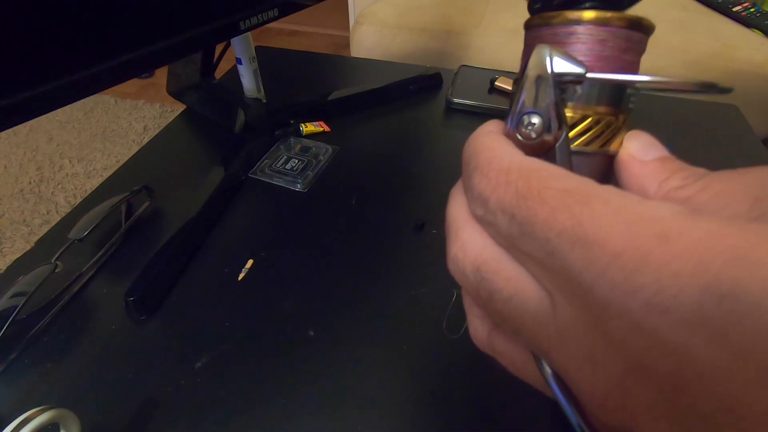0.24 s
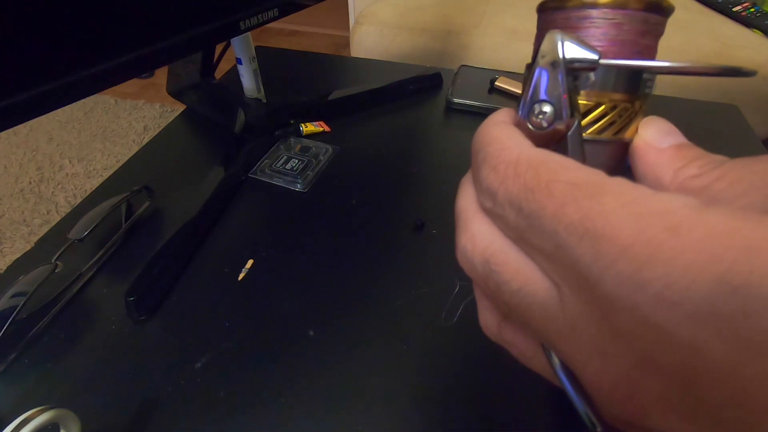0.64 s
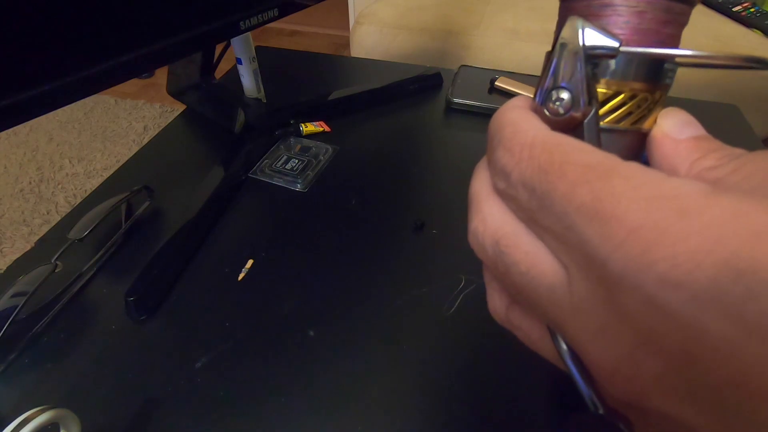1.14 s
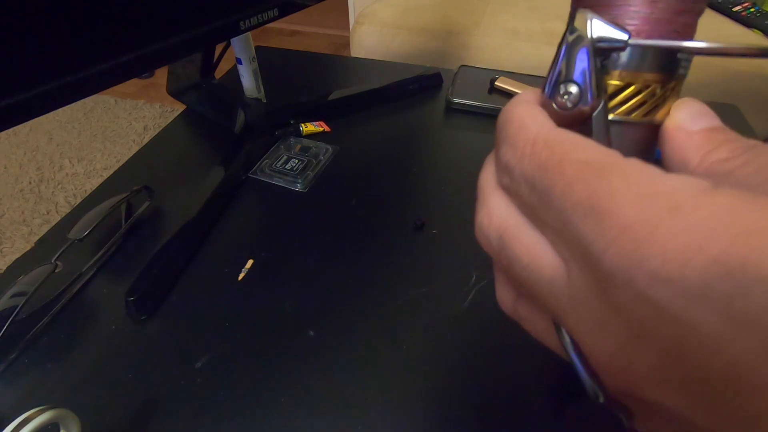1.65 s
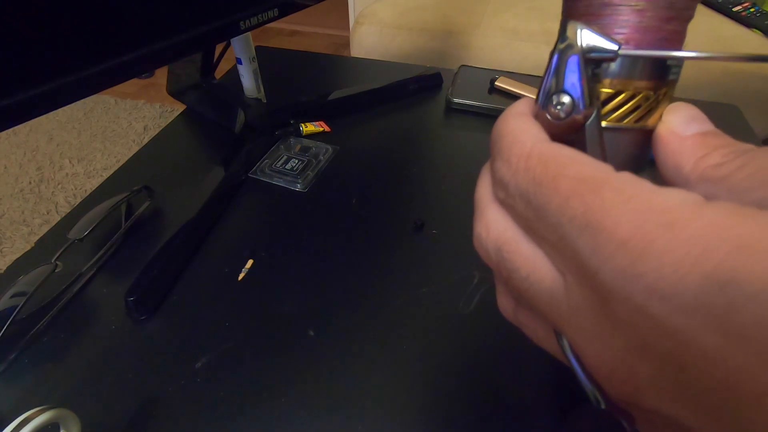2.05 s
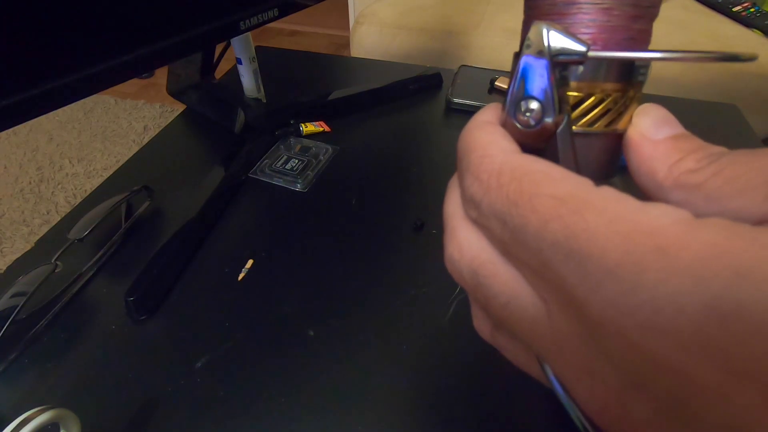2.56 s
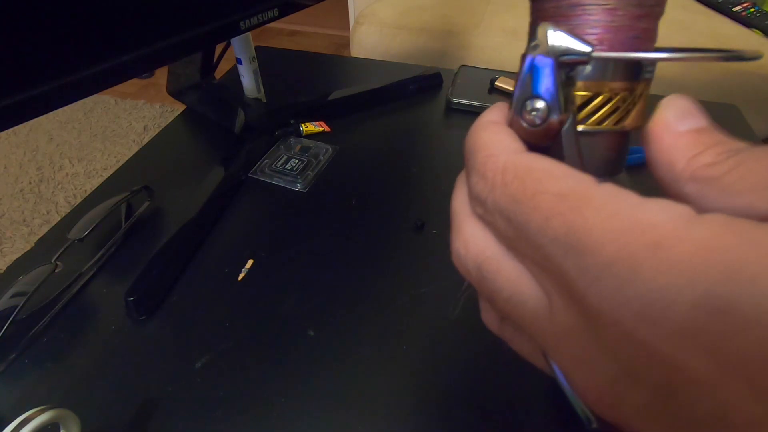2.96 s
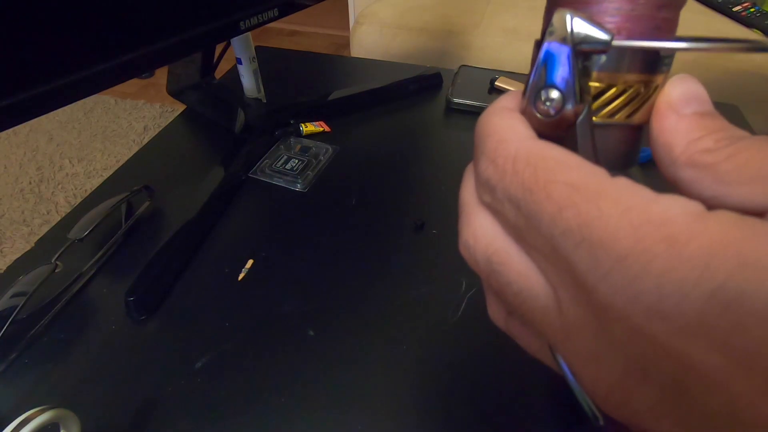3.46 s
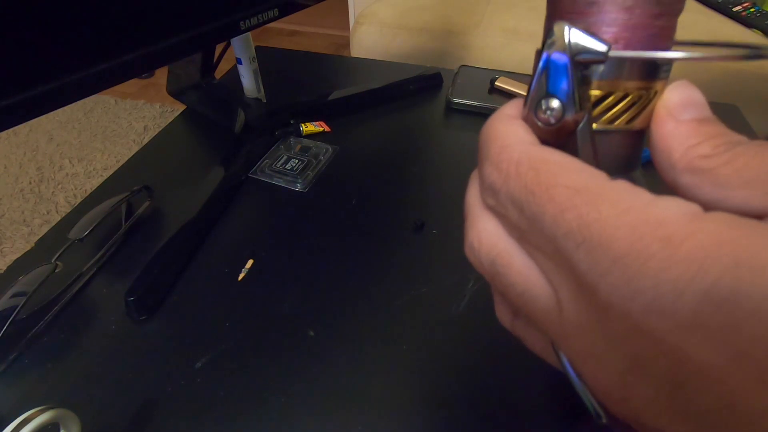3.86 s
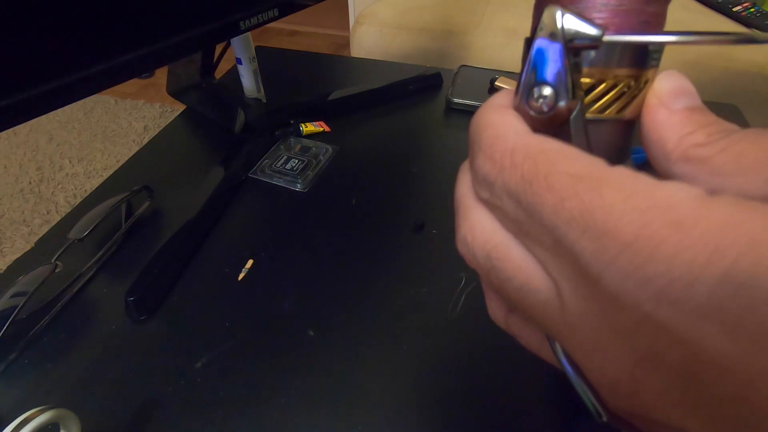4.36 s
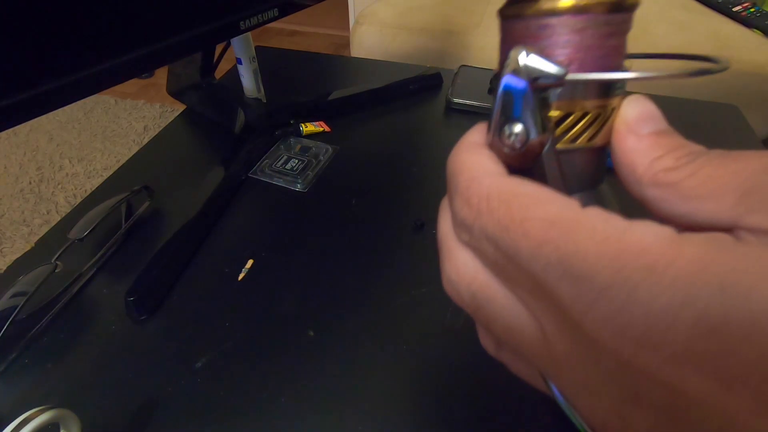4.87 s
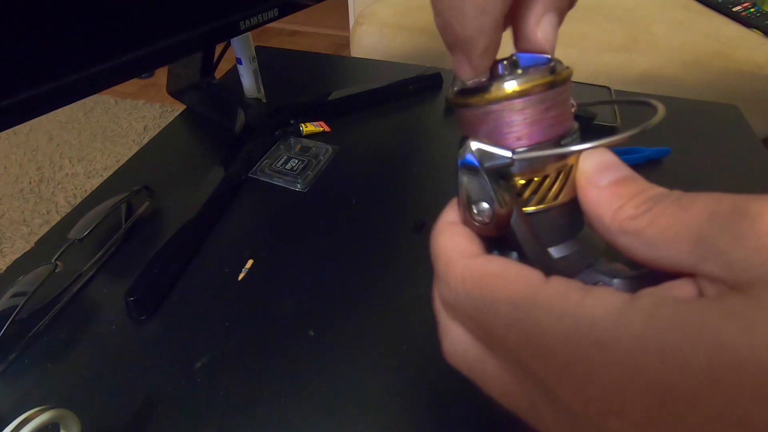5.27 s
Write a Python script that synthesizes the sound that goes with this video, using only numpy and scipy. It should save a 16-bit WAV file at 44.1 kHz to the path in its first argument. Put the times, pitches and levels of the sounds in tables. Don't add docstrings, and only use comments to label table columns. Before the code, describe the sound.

A close, dry stereo take of a fishing reel handled over a desk in a small furnished room, with quiet air hush and a faint wandering low drone throughout. The first half second is nearly still, with tiny finger ticks around 0.5. A hard latch click comes at 0.75, its spring-back double click at 0.82. Light taps follow at 1.1 and 1.4, a sharp snap at 1.53, then a loose metal bail stumbles shut at 1.6-1.65 with rattle and a brief buzz. The drag ratchets in five runs: nine slow, uneven, gathering clicks at 2.0-2.5; then quick, bright, thin metallic runs at 3.0-3.4, 3.85-4.2, 4.6-4.85 and 5.35-5.5, roughly 50 to 85 clicks per second at their densest. Each click is a millisecond-short, hollow, ringing tick around 3-4 kHz with crisp treble and a short room tail. Between runs, faint creaks, skin rub, small slips and soft palm thuds.

```python
import sys
import numpy as np
from scipy import signal
from scipy.fft import rfft, irfft, next_fast_len
from scipy.io import wavfile

SR = 44100
rng = np.random.default_rng(int(sys.argv[2]) if len(sys.argv) > 2 else 0)


def inscribe(sig):
    pcm = np.round(np.clip(np.atleast_2d(sig).T, -1, 1) * 32767)
    wavfile.write(sys.argv[1], SR, pcm.astype(np.int16))


def gain_from_decibels(decibels):
    exponent = np.asarray(decibels, float) / 20
    return 10 ** exponent


N = 242991

# frequency in Hz, level in dB, T60 in s, phase lead of the left port in radians.
SPOOL = [(1500, -36, 0.0061, 0.3), (2023, -23, 0.025, 0.2), (2534, -6.5, 0.012, 0.1),
         (2837, -10.5, .008, .1), (3190, -5.5, 0.017, 0.14), (3403, 0, 0.014, 0.1),
         (3813, -0.5, 0.01, 0.099), (4344, -5, 0.011, 0.4)]
RIM = [(5320, -9, 0.014, 0.6), (6000, -7, 0.011, 1), (7100, -2, 0.009, 0.84), (6540, -9.5, 0.011, 0.96),
       (7720, 0, 0.009, 0.28), (8390, -7, 0.014, 0.99)]
SPRING = [(8800, -17, 0.0099, -2.4), (9530, -1, 0.0086, -2.02), (9930, -7.5, 0.0087, -0.15),
          (10410, -8, 0.01, 1)]
# spool tilt at start and at end in dB per octave, body level in dB,
# level of the creep left after it in dB.
GRIPS = [
    (23.5, 15, -35.5, -65.5),
    (-7, -15.5, -38, -82),
    (-12, -9.5, -32, -68),
    (-3, -4, -34, -65),
    (5.5, 6.5, -31, -70),
]


def twists():
    # time in s, strength in dB, facing in dB (plus turns the spool wall to the ports, minus the rim),
    # lean in dB (plus favours the lower wall modes' rivals above), spring in dB above the strength.
    twist_1 = [
        (1.9756, -20.5, -2.5, -0.35, 4.5),
        (2.0193, -15, -2.5, 0.35, 1.5),
        (2.1584, -13, 0, 3.5, 0),
        (2.2192, -12.5, 2, 2, -0.5),
        (2.3274, -12, 1.5, 2.7, -5.5),
        (2.373, -9.5, 1, 1.8, -2),
        (2.4192, -9.5, 0.5, 0.67, -2.5),
        (2.4458, -7.5, 1.5, -1.3, -7),
        (2.4909, -8, -3, -1.2, -6),
    ]
    twist_2 = [(2.9846, -16, -4.5, 7.5, -0.5), (3.0391, -9.5, -5, 4.5, 0.5), (3.0753, -8.5, -2.5, 4, -0.5),
               (3.0981, -7.5, -5.5, 7, -4.5), (3.1196, -11.5, -4, 1, 3.5), (3.142, -13, -8, -6, 5),
               (3.1618, -8, -7, -2.5, 3), (3.1784, -11.5, -7, -4, 5.5), (3.194, -13.5, -6.5, -3.5, 4),
               (3.2088, -12.5, -7, -0.5, 6), (3.2243, -12, -5.5, 1.5, 5), (3.2401, -13.5, -6, 0, 6.5),
               (3.2621, -16.5, -9, -6, 5.5), (3.289, -13.5, -6.5, 0.5, 3), (3.3116, -16.5, -6, -5.5, 2),
               (3.3308, -14.5, -6.5, 3, 1), (3.3497, -14.5, -3.5, 1.5, -2), (3.37, -13, -6, -3.5, -2.5),
               (3.3973, -14, -6, -2, -2.5)]
    twist_3 = [(3.8573, -15.5, -3, 0.5, 5), (3.8734, -14, -4.5, -3.5, -1), (3.888, -13.5, -5, -1.5, 1.5),
               (3.905, -14.5, -6, -5.5, 6), (3.9291, -14, -8, -4.5, 2.5), (3.9585, -13.5, -6, -1.5, 5.5),
               (3.9794, -13.5, -4, 2.5, 5.5), (3.9967, -11, -0.5, -0.5, 7.5), (4.0108, -14.5, 0.5, 6.5, 6),
               (4.024, -10, -2, 0, 3.5), (4.0356, -12, -2, -1.5, 3.5), (4.0475, -9.5, -1, -1, 4.5),
               (4.0603, -13, -2, 2.5, 2.5), (4.0732, -12.5, -3, 1, 4), (4.0863, -11.5, -9, -7, 5.5),
               (4.1002, -8, -1.5, 1.5, 3), (4.1145, -11, -3, -6, 1.5), (4.13, -8, -2, -1.5, -2.5),
               (4.1495, -11, -1.5, -0.5, -0.5), (4.1816, -15, -2, -8, 2)]
    twist_4 = [(4.6063, -14.5, -5.5, -4, 4.6), (4.6239, -14.5, -4, -2, 6), (4.6357, -13.5, -1, -3.5, 4.5),
               (4.646, -10.5, -5, 2, 7.4), (4.6581, -13.5, -3.5, -5, 6.5), (4.6695, -11, -2.5, 1, 7),
               (4.6846, -14, -1.5, -3.5, 9.8), (4.7008, -9.5, -3.5, -3, 6), (4.7174, -13, -3.5, 0.5, 8.4),
               (4.7329, -12.5, -0.5, -1, 5.3), (4.7488, -12.5, -3, 0, 5.5),
               (4.7631, -11.5, -1.5, -0.5, 4.9), (4.7765, -9.5, -1.5, 0, 7), (4.791, -9.5, -3.5, -5, 3),
               (4.8052, -10.5, -5, -7.5, 1.5), (4.8224, -11.5, -4.5, -9, 1.0), (4.8379, -12, -1, 0.5, 3.7),
               (4.8584, -16, -2.5, -3, 4.9)]
    twist_5 = [(5.3496, -15, -0.5, -0.0078, 4.1), (5.379, -12, -0.5, -0.2, 3),
               (5.399, -11.5, -0.5, -1.2, 5.8), (5.4138, -14, -1.5, -0.86, 5.5),
               (5.4265, -10.5, -1, -1.2, 4.5), (5.4379, -10.5, -0.5, -2.0, 5.4), (5.447, -12, 1, -0.5, 1.5),
               (5.458, -9, 2, -0.19, 0.91), (5.47, -15, 0, 0.66, 4.5), (5.4903, -12.5, -1.5, 0.5, 4.5),
               (5.5063, -15, 1.5, -1.0, 3.5)]
    return [np.transpose(t) for t in (twist_1, twist_2, twist_3, twist_4, twist_5)]


def arch(along, top, sag_db):
    return -sag_db * ((along - top) / max(top, 1 - top)) ** 2


def clicker():
    # frequency in Hz, level in dB, T60 in s, left lead in radians.
    body_modes = [(760, -14, 0.0041, 0.61), (900, -3, 0.053, 0.35), (1176, -0.5, 0.042, 1),
                  (1525, 7.5, 0.016, 0.25)]
    edge_modes = [(11200, -3, 0.0086, .3), (11900, -4.5, .007, 0), (12400, -3, 0.0088, -0.16),
                  (12500, -2.5, .007, -.2), (13470, -1.5, 0.0066, -0.38), (13800, 0, 0.006, 0.31),
                  (14600, -1, 0.007, 0.81), (15200, -3.5, .006, 0), (15800, -14.5, .005, -.9)]
    take_up_s, take_up_db = 0.0107, -38
    walls_ignore = 0.23
    runs = twists()
    rows = []
    for (s, *_), (tilt_from, tilt_to, grip_db, _) in zip(runs, GRIPS):
        along = np.linspace(0, 1, len(s))
        swell = arch(along, top=0.77, sag_db=9)
        tilt = tilt_from + (tilt_to - tilt_from) * along
        rows.append([grip_db + swell, tilt, -14.5 + 0.79 * swell])
    body_db, tilt_db, edge_db = np.concatenate(rows, axis=1)
    s, db, facing, lean, spring = np.concatenate(runs, axis=1)

    turns_db = [facing - lean, facing + lean, -facing]
    lower_db, upper_db, rim_db = [db + turn_db for turn_db in turns_db]
    turning = [
        strike(s, lower_db - 0.06, SPOOL[:6], spread_db=5.0, detune=0.016, rise_s=0.0004524, tilt_db=tilt_db),
        strike(s, upper_db - 0.26, SPOOL[6:], spread_db=2.5, detune=0.036, rise_s=0.0004487),
        strike(s, rim_db + 0.88, RIM, spread_db=4.0, detune=0.025, rise_s=0.000399)]
    rest = strike(s, db + spring + 0.44, SPRING, spread_db=1.5, detune=0.02, rise_s=0.0003007)
    rest += strike(s, edge_db, edge_modes, spread_db=4.5, detune=0.018, rise_s=0.0002)
    first = np.array([t[0, 0] for t in runs]) - take_up_s
    rest += strike(first, take_up_db + 0 * first, RIM + SPOOL[2:], spread_db=5.5, detune=0.046, rise_s=0.0003)
    body = strike(s - 0.00045, body_db, body_modes, spread_db=3.0, detune=0.051, rise_s=0.00049)
    body = radiate(body, hz=455)

    latest = np.clip(np.searchsorted(s, np.arange(N) / SR + 1 / SR) - 1, 0, None)
    walls = sum(x * gain_from_decibels(-walls_ignore * turn_db[latest]) for x, turn_db in zip(turning, turns_db))
    return radiate(sum(turning) + rest, hz=1430) + body, radiate(walls + rest, hz=1350) + body


def strike(times, peaks_db, modes, spread_db, detune, rise_s, tilt_db=0, pitch_hz=1):
    ring_share, crack_s, out_of_step_rad = 0.84, 0.0011, 0.85
    pan_db_per_octave, pan_spread_db = 1.5, 3.5
    hz, db, t60, lead = np.repeat(modes, 2, axis=0).T[:, None, :, None]
    draw = rng.standard_normal((len(times), 5, 2 * len(modes), 1))
    t = np.arange(700) / SR
    pitch = np.reshape(pitch_hz, (-1, 1, 1))
    db = db + np.reshape(tilt_db, (-1, 1, 1)) * np.log2(hz / 3400) + spread_db * draw[:, 0]
    turn = 2 * np.pi * hz * pitch * (1 + detune * draw[:, 1]) * (t - rise_s) + out_of_step_rad * draw[:, 2]
    onset = 1 - np.exp(-(t / rise_s) ** 2)
    size = gain_from_decibels(db - 60 * t / t60) * onset * (ring_share + np.exp(-t / crack_s))
    apart = (lead + (0.57 * lead + 0.092 + 0.1 * (hz / 4000) ** 2) * draw[:, 3]) / 2
    pan = gain_from_decibels((pan_db_per_octave * np.log2(hz * pitch / 6000) + pan_spread_db * draw[:, 4]) / 2)
    left = (size * pan * np.exp(1j * (turn + apart))).sum(axis=1)
    right = (size / pan * np.exp(1j * (turn - apart))).sum(axis=1)
    gain = gain_from_decibels(peaks_db) / np.abs(left + right).max(axis=1) * 2
    out = np.zeros((2, N + 700))
    at = np.round(np.asarray(times) * SR).astype(int)[:, None] + np.arange(700)
    np.add.at(out[0], at, gain[:, None] * left.imag)
    np.add.at(out[1], at, gain[:, None] * right.imag)
    return out[:, :N]


def ring(push, hz, t60, lead):
    pole = gain_from_decibels(-60 / (t60 * SR)) * np.exp(2j * np.pi * hz / SR)
    z = signal.lfilter([1], [1, -pole], push + 1e-18)
    return np.array([np.imag(z), np.imag(z * np.exp(-1j * lead))])


def radiate(x, hz):
    return signal.sosfilt(signal.butter(4, hz, "high", fs=SR, output="sos"), x)


def slipping_washer():
    # time in s, level in dB.
    slip_events = [(0.322, -56), (2.1477, -41.5), (2.5764, -24.5), (2.766, -50.5), (2.806, -43),
                   (2.85, -49.5), (2.893, -53.5), (3.546, -46.5), (3.7041, -33.5), (3.7084, -36),
                   (3.772, -41), (3.797, -44), (3.812, -45), (3.835, -48), (4.1562, -34), (4.2793, -45),
                   (4.304, -50), (4.3358, -50), (4.364, -51), (4.3874, -41.5), (4.4409, -53), (4.5026, -57),
                   (4.5201, -51.5), (4.586, -54), (4.854, -22), (5.163, -52), (5.178, -51), (5.187, -53),
                   (5.08, -25.5), (5.088, -46.5), (5.3196, -41.5), (5.3318, -35)]
    # frequency in Hz, level in dB, T60 in s, left lead in radians.
    hollow = [(2700, -8.5, .008, .1), (3218, 3, 0.012, .1), (3650, -6.5, .012, .1), (4150, -17, 0.0064, .2)]
    s, db = np.transpose(slip_events)
    out = strike(s, db - 1.0, hollow, spread_db=-0.5, detune=0.015, rise_s=0.00042)
    out += strike(s, db - 2, SPOOL, spread_db=-3.0, detune=0.0091, rise_s=0.00021, tilt_db=-2.5)
    return out + strike(s, db - 10.5, RIM + SPRING, spread_db=1.0, detune=0.04, rise_s=0.00046)


def half_snaps():
    # time in s, level in dB.
    half_events = [
        (1.5307, -12.5),
        (1.5316, -29),
        (1.536, -41),
    ]
    # frequency in Hz, level in dB, T60 in s, left lead in radians.
    half_modes = [(2280, -6.5, 0.008, .1), (2940, -4, .006, 0.39), (3840, 0, 0.0061, 0.28),
                  (4650, 4, 0.0052, 0.39), (6240, -9, 0.0072, 0.97), (7430, 0.5, 0.0086, 0.94),
                  (9360, -5, 0.0093, -1.2), (10430, -5, .008, 0.65), (12100, -7, 0.0057, .2),
                  (13100, -9, .006, 0.55)]
    return strike(*np.transpose(half_events), half_modes, spread_db=2.0, detune=0.028, rise_s=0.00048)


def closing_bail():
    # time in s, level in dB, brightness in dB.
    clunk = [(1.606, -23, -4), (1.6078, -24, -1), (1.613, -19, -3), (1.6195, -17.5, -9), (1.6246, -12, -6),
             (1.627, -23, 7), (1.6299, -14, 4), (1.632, -18, 5), (1.6357, -4, -1.5), (1.6373, -17, 6),
             (1.6393, -14, 0), (1.642, -12.5, -6), (1.6485, -21, -3), (1.651, -29, -3)]
    # time in s, level in dB.
    rattle = [
        (1.597, -51),
        (1.606, -28),
        (1.622, -30),
        (1.63, -25.5),
        (1.641, -24.5),
        (1.644, -37),
        (1.66, -35.5),
        (1.69, -50),
    ]
    # frequency in Hz, level in dB, T60 in s, left lead in radians.
    arm = [(900, -14, 0.012, 0.74), (1380, -8, 0.013, .5), (1930, 1, 0.012, .4), (2560, -0.5, 0.0082, .1),
           (2870, -3, 0.009, .2), (3400, -3, .009, .3), (3930, -2, .01, .1), (4410, -5, 0.011, 0.24)]
    arm_top = [(5470, -5, .005, 1), (6200, -4, .005, 0.89), (7430, 0, 0.0077, -1), (8400, -5.5, .005, -1.1),
               (8930, -1, .006, -1.7), (9700, -1, 0.00595, -1), (11200, -6.5, .004, 1),
               (12800, -6, .004, 1)]
    s, db, bright = np.transpose(clunk)
    out = strike(s, db, arm, spread_db=4.0, detune=0.04, rise_s=0.0004)
    out += strike(s, db - 7 + bright, arm_top, spread_db=-0.5, detune=0.04, rise_s=0.0004)
    shakes = np.interp(np.arange(80) + rng.random(80), [0, 80], [rattle[0][0], rattle[-1][0]])
    shake_db = np.interp(shakes, *np.transpose(rattle)) + 3.0 * rng.standard_normal(len(shakes))
    out += strike(shakes, shake_db, arm, spread_db=2.0, detune=0.055, rise_s=0.00033)
    return out + strike(shakes, shake_db - 7.5, arm_top, spread_db=1.0, detune=0.05, rise_s=0.00042)


def latch():
    # time in s, level in dB, tilt in dB per octave.
    press = [
        (0.728, -49, -4),
        (0.7384, -34, 0),
        (0.7489, -5, 0),
        (0.7496, -10.5, 3.5),
    ]
    spring_back = [
        (0.8214, -19, 2.5),
        (0.8218, -3.5, 0.5),
        (0.826, -19, 7),
        (0.828, -6.5, 3),
        (0.8323, -20, -2.5),
    ]
    # frequency in Hz, level in dB, T60 in s, left lead in radians.
    press_modes = [(900, -28.5, 0.022, 1), (1500, -28, 0.0063, 0.49), (2264, -3, 0.01, .1),
                   (3173, -2.5, 0.012, 0.16), (3740, -3, 0.011, .15), (4500, -6.5, 0.0077, .15),
                   (5540, -9.5, 0.013, 0.84), (6600, -20, 0.0048, .8), (7670, -4.5, 0.011, 0.5),
                   (11600, -45, .003, 0.49)]
    back_modes = [(900, -25, 0.021, 0.62), (1780, -11, 0.0122, 0.34), (2200, -7.5, .01, .3),
                  (2540, -2.5, 0.014, .1), (3200, -4.5, .008, .15), (3960, -7.5, 0.014, 0.13),
                  (5460, -15, 0.0089, 0.6), (6450, -23, 0.0046, .8), (7530, -8, 0.0087, 0.614),
                  (9350, -18, 0.0055, .5)]
    s, db, tilt_db = np.transpose(press)
    out = strike(s, db, press_modes, spread_db=1.0, detune=0.0216, rise_s=0.00038, tilt_db=tilt_db)
    s, db, tilt_db = np.transpose(spring_back)
    return out + strike(s, db, back_modes, spread_db=-2.5, detune=0.048, rise_s=0.0004, tilt_db=tilt_db)


def touches():
    # time in s, level in dB, brightness in dB, pitch of the touched part in Hz.
    knocks = [(0.4755, -39.5, 4, 2300), (0.486, -46, -9, 2250), (0.49, -42, -14, 2450),
              (0.5692, -44, 13, 2040), (1.085, -40.5, -3.5, 900), (1.0972, -26.5, -9, 2800),
              (1.4108, -43, -5, 4600), (1.4144, -49, -3, 2800), (1.4195, -42.5, -8, 4500),
              (1.44, -26.5, -6.5, 1866), (2.605, -35.5, -2.5, 1500), (2.8056, -47, -11, 2814),
              (3.705, -37, -6, 786), (3.708, -35.5, -1.5, 1544), (3.8123, -47.5, -8, 1600),
              (4.232, -45.5, -2, 1500), (4.923, -36, -2, 3200), (5.032, -42, 4, 1790)]
    # frequency in Hz, level in dB, T60 in s, left lead in radians.
    dull = [(842, -24, 0.1, 0.91), (1087, -8.5, 0.009, 0.9), (1497, 1.5, 0.0072, 0.44),
            (2100, 4, 0.0087, 0.43)]
    middle = [(2560, -7.5, 0.0034, 0.14), (2740, 1.5, 0.019, 0.11), (3200, -4, 0.013, 0.3),
              (4280, -2, 0.015, .1), (4570, -3, 0.011, .2), (5500, -13, 0.0072, .6)]
    bright_modes = [(5830, -2, 0.0044, 3), (7000, 7, 0.0029, -1.5), (7140, -0.5, 0.0096, 0),
                    (9900, -5.5, 0.0063, -2.2), (10300, -10, 0.0052, 6), (13120, -16, 0.0028, 6.5)]
    touched = [(0.97, 0, 0.013, 0.2)]
    s, db, bright, hz = np.transpose(knocks)
    out = strike(s, db + 1, touched, spread_db=6.5, detune=0.0092, rise_s=0.00028, pitch_hz=hz)
    frame_db = db - 1.5
    out += strike(s, frame_db - 5.5 - bright, dull, spread_db=-2.5, detune=0.05, rise_s=0.00052)
    out += strike(s, frame_db - 0.4, middle, spread_db=0.0, detune=0.036, rise_s=0.00038)
    return out + strike(s, frame_db - 11 + bright, bright_modes, spread_db=-2.0, detune=0.073, rise_s=0.00057)


def handling():
    return radiate(touches() + closing_bail() + latch() + half_snaps() + slipping_washer(), hz=604)


def buzz():
    # frequency in Hz, bandwidth in Hz, level in dB.
    wire = [(4170, 490, -43), (2980, 1200, -40), (1905, 1100, -47.5)]
    from_s, t60_s = 1.641, 0.27
    since = np.arange(N) / SR - from_s
    noise = rng.standard_normal(N) * gain_from_decibels(2.1 * drift(48.0))
    bands = sum(gain_from_decibels(db) * rms_one(ring(noise, hz, 8.6 / width, 0.2)) for hz, width, db in wire)
    return bands * (since > 0) * gain_from_decibels(-60 * np.abs(since) / t60_s)


def thuds():
    # time in s, peak level in dB, frequency in Hz.
    palm = [
        (0.824, -38.5, 237),
        (0.826, -44, 349),
        (1.429, -44, 276),
        (1.631, -49.5, 261),
        (3.097, -38, 196.6),
        (4.232, -35.5, 220),
        (4.917, -42, 210.5),
        (5.059, -68, 192),
    ]
    out = np.zeros((2, N))
    for s, db, hz in palm:
        push = np.zeros(N)
        push[round(s * SR):][:60] = gain_from_decibels(db - 3.5) * np.hanning(60) / 30
        out += ring(push, hz, 0.081, 0.27) + 0.77 * ring(push, 2.4 * hz, 0.021, 0.26)
    return radiate(out, hz=125.6)


def rubbing():
    # time in s, level in dB.
    rub = [
        (0.0, -72),
        (0.35, -82.5),
        (0.75, -72.5),
        (1.2, -90.5),
        (1.5, -66),
        (1.9, -79.5),
        (2.7, -70),
        (3.7, -75),
        (4.35, -71),
        (5.15, -76.5),
    ]
    # frequency in Hz, level in dB per Hz.
    rub_colour = [(1200, -16.5), (2500, -3), (4500, 1), (7000, 2), (9500, 3.5), (11000, -13),
                  (13500, -19.5), (16000, -47.5)]
    creep_db_per_s, creep_rest_db, creep_patchy_db = 19, -83, -1.5
    rub_db, = in_time(rub)
    since = np.arange(N) / SR - np.array([[t[0, -1]] for t in twists()])
    fading_db = np.array(GRIPS)[:, -1:] - creep_db_per_s * since
    creak_db = np.where(since > 0, fading_db, creep_rest_db).clip(creep_rest_db).max(axis=0)
    slips = (rng.random(N) < 250.0 / SR) * gain_from_decibels(3.0 * np.minimum(rng.exponential(1, N), 4))
    slips = slips * rng.choice([-1, 1], N)
    slips = signal.sosfilt(signal.butter(2, [2800, 4100], "band", fs=SR, output="sos"), slips + 1e-18)
    creak = rms_one(ring(slips, 3280, 0.013, 0.1) + 0.6 * ring(slips, 3650, 0.009, 0.1))
    hiss = np.array([coloured(rub_colour), coloured(rub_colour)]) * gain_from_decibels(1.1 * drift(16.0))
    return gain_from_decibels(creak_db + creep_patchy_db * drift(6.0)) * creak + gain_from_decibels(rub_db + 5.0) * hiss


def room(x):
    # delay in s, spread in s.
    echoes = [
        (.0087, .0004),
        (.0128, .0005),
        (.0143, .0005),
        (.0158, .0006),
        (.0178, .0007),
    ]
    echo_db = [-22, -32.5, -36.5, -31.5, -32]
    echo_bright_db = [-12.5, 3, 2.5, 11.5, 3]
    # frequency in Hz, level in dB.
    wall_colour = [(300, 0), (2300, -1), (3400, -1.5), (5300, -1), (7000, -1.5), (10700, 0.5), (11800, -2),
                   (20000, -3.5)]
    t60_s, treble_t60_s, tail_db, tail_bright_db = 0.25, 0.14, -13, 3
    t = np.arange(round(0.45 * SR)) / SR
    build_up = np.clip((t - 0.002) / 0.016, 0, 1)
    tail = gain_from_decibels(tail_db - 60 * t / t60_s) * build_up * np.sqrt(np.log(1e6) / t60_s / SR)
    shape = gain_from_decibels([[0], [tail_bright_db]]) * tail
    for (delay, spread), db, bright_db in zip(echoes, echo_db, echo_bright_db):
        bump = np.exp(-0.5 * ((t - delay) / spread) ** 2) / np.sqrt(spread * SR)
        shape = shape + gain_from_decibels([[db], [db + bright_db]]) * bump
    noise = rng.standard_normal((2, len(t)))
    low = signal.filtfilt(*signal.butter(2, 5500, fs=SR), noise)
    mid, side = low * shape[0] + (noise - low) * shape[1]
    side = signal.lfilter(*signal.butter(1, 3500, "high", fs=SR), side)
    reply = signal.lfilter(*signal.butter(2, 15500, fs=SR), [mid + side, mid - side])
    reply = signal.lfilter(*signal.butter(1, 1500, "high", fs=SR), reply)
    reply = reply + 0.34 * signal.lfilter(*signal.iirpeak(3280, 3280 / 350, fs=SR), reply)
    treble = signal.lfilter(*signal.butter(1, 10500, "high", fs=SR), reply)
    reply = reply - treble * (1 - gain_from_decibels(-60 * t / treble_t60_s))
    return signal.fftconvolve(shaded(all_round(x), wall_colour)[None], reply, axes=1)[:, :N]


def all_round(x):
    blur = signal.lfilter(*signal.butter(2, 700, fs=SR), rng.standard_normal(N))
    analytic = signal.hilbert(x.mean(axis=0), next_fast_len(N))[:N]
    return np.real(analytic * np.exp(1j * 1.0 * rms_one(blur)))


def drone():
    # frequency in Hz, level in dB per Hz.
    low_band = [(120, -30), (150, -3), (195, 2.5), (250, -3), (330, -11.5), (400, -23)]
    hz = 261 * (1 + 0.086 * drift(2.9) + 0.016 * drift(20.0))
    phase = 2 * np.pi * np.cumsum(hz) / SR
    tone = gain_from_decibels(-67.5) * np.array([np.sin(phase), np.sin(phase - 2.4)])
    throb_db = -63.5 + np.clip(6.5 * drift(15.0), -9, 6)
    return tone + gain_from_decibels(throb_db) * coloured(low_band)


def hush():
    # frequency in Hz, level in dB per Hz.
    mid_colour = [(12, -36), (20, 5), (40, -9.5), (61, -15.5), (97, -25.5), (139, -14), (194, -18.5),
                  (387, -22), (587, -27.5), (733, -16.5), (1080, -28.5), (1240, -25.5), (2690, -32.5),
                  (9370, -39.5), (15000, -63)]
    side_colour = [(11, -26), (18, -9.5), (35, -16), (112, -24.5), (186, -6), (318, -9), (498, -23),
                   (698, -9.5), (850, -8.5), (1100, -17.5), (1720, -22), (2280, -30.5), (12000, -49.5),
                   (15000, -57.5)]
    mid = gain_from_decibels(-52.5 - 8.0 + 0.53 * drift(2.1)) * coloured(mid_colour)
    side = gain_from_decibels(-57 + 0.8 * drift(5.0)) * coloured(side_colour)
    return np.array([mid + side, mid - side])


def coloured(spectrum):
    size = next_fast_len(N)
    hz = np.arange(size // 2 + 1) * SR / size
    return rms_one(irfft(rfft(rng.standard_normal(size)) * amp_of_hz(spectrum, hz), size)[:N])


def shaded(x, spectrum):
    size = next_fast_len(N)
    hz = np.arange(size // 2 + 1) * SR / size
    return irfft(rfft(x, size) * amp_of_hz(spectrum, hz), size)[..., :N]


def amp_of_hz(points, hz):
    point_hz, db = np.array(points)[:, 0], np.array(points)[:, 1]
    return gain_from_decibels(np.interp(np.log(hz + 1e-9), np.log(point_hz), db, left=-80, right=-80))


def drift(rate):
    knots = rng.standard_normal(400)
    return np.interp(np.arange(N) / SR * np.clip(rate, 0.1, 70), np.arange(400), knots)


def rms_one(x):
    return x / np.sqrt(np.mean(x ** 2) + 1e-20)


def in_time(rows):
    s, *columns = np.transpose(rows)
    return [np.interp(np.arange(N) / SR, s, c) for c in columns]


def scene():
    # time in s, left over right in dB.
    side_of_reel = [
        (0, 2.5),
        (2.2, 0),
        (3.3, 2.5),
        (3.9, 1.5),
        (4.1, 1),
        (4.7, 1.5),
        (5.4, 1),
    ]
    pan_db, = in_time(side_of_reel)
    near, walls = clicker()
    hands = handling()
    reel = (near + hands + buzz()) * gain_from_decibels([pan_db / 2, -pan_db / 2])
    answer = room(walls + gain_from_decibels(0.5) * hands)
    return reel + answer + thuds() + rubbing() + drone() + hush()


def top_cut(x):
    return signal.sosfilt(signal.butter(12, 16500, fs=SR, output="sos"), x)


def record(dry):
    overload = 4
    cut = signal.sosfilt(signal.cheby2(10, 60, 16450, fs=SR, output="sos"), dry)
    mix = cut / (1 + np.abs(cut) ** overload) ** (1 / overload)
    return top_cut(mix)


dry = scene()
out = record(dry)
inscribe(out)
```